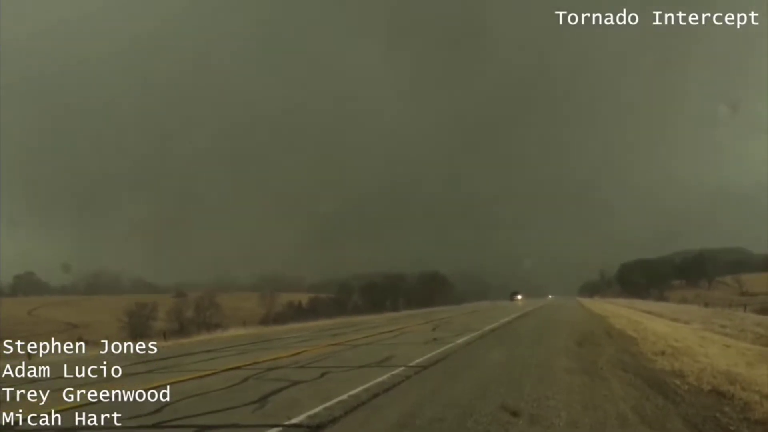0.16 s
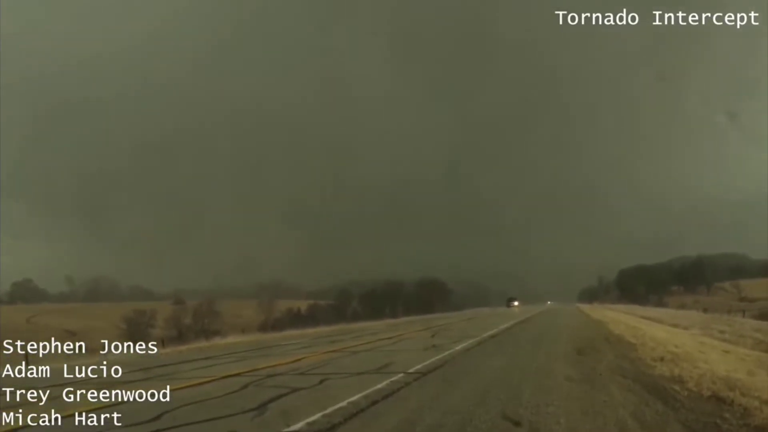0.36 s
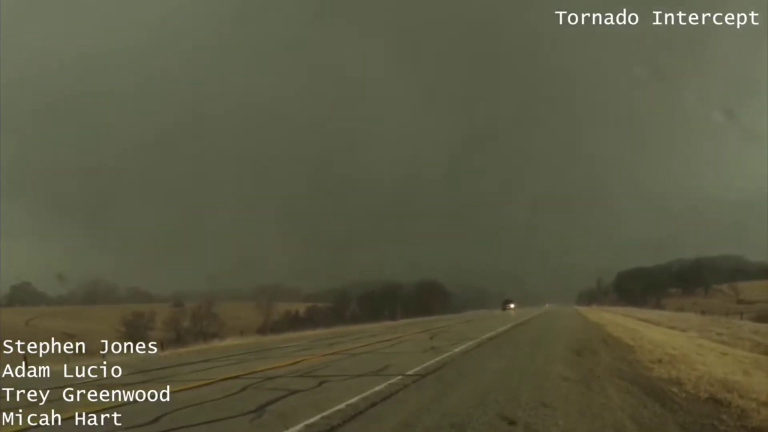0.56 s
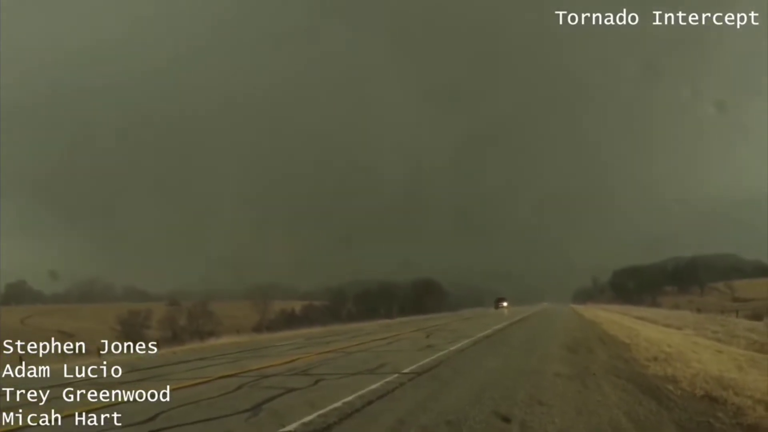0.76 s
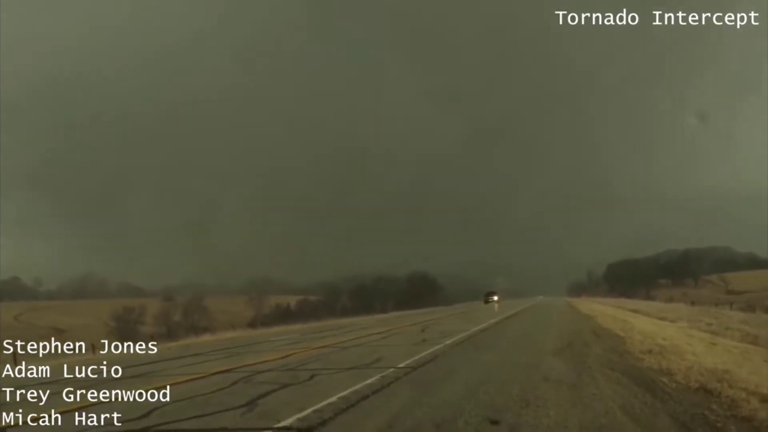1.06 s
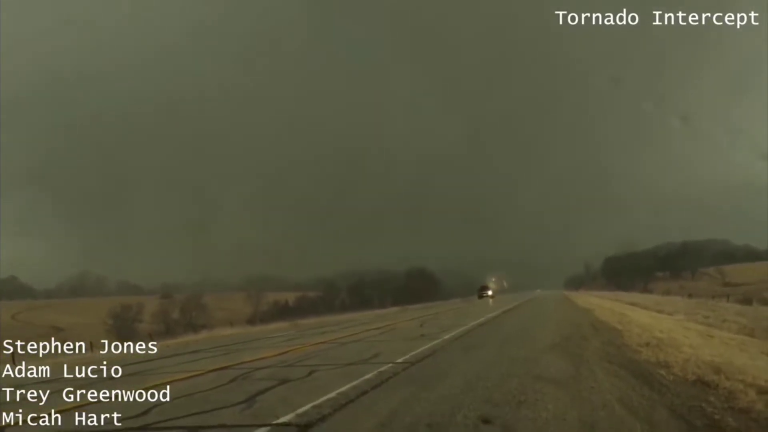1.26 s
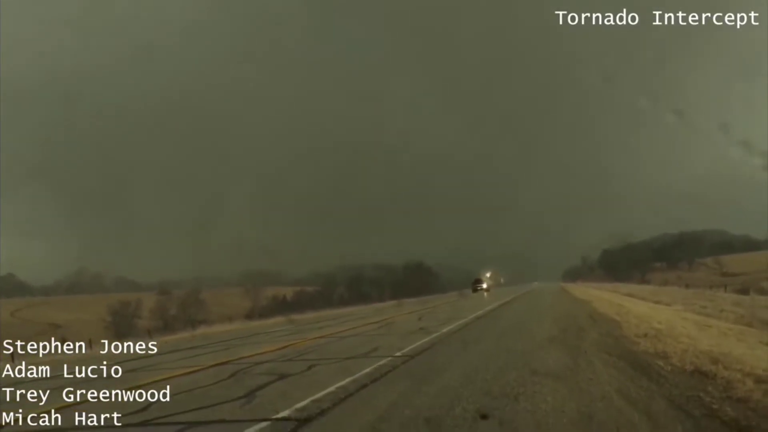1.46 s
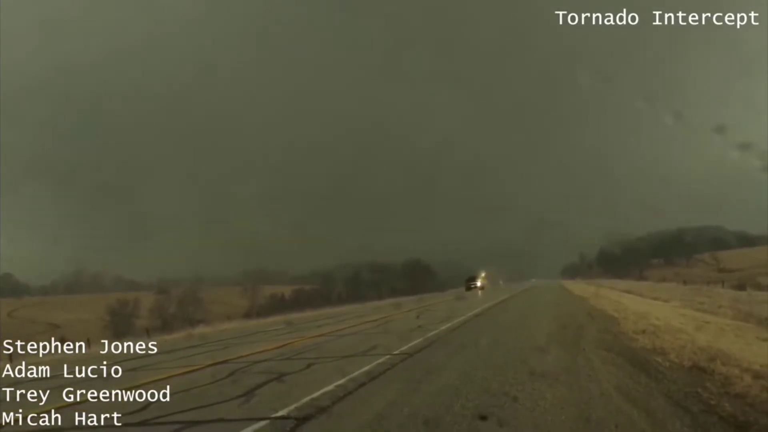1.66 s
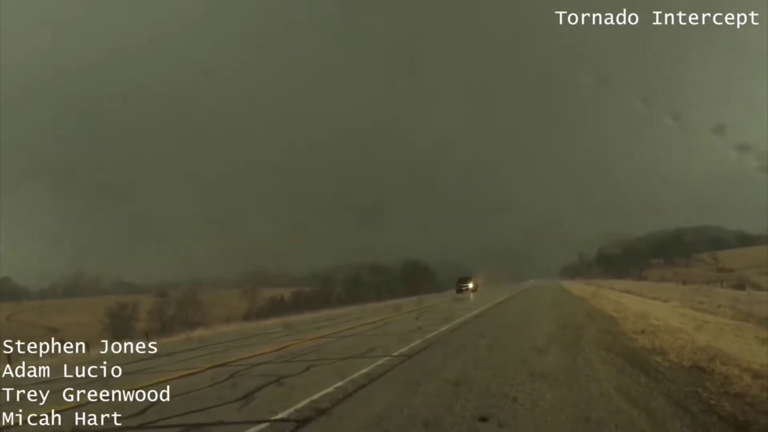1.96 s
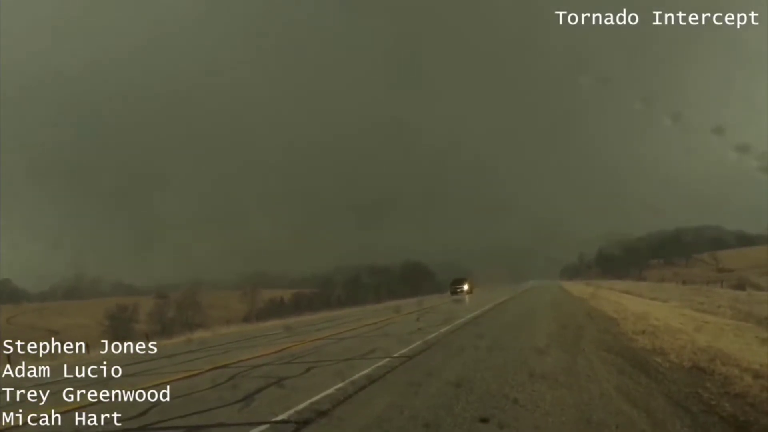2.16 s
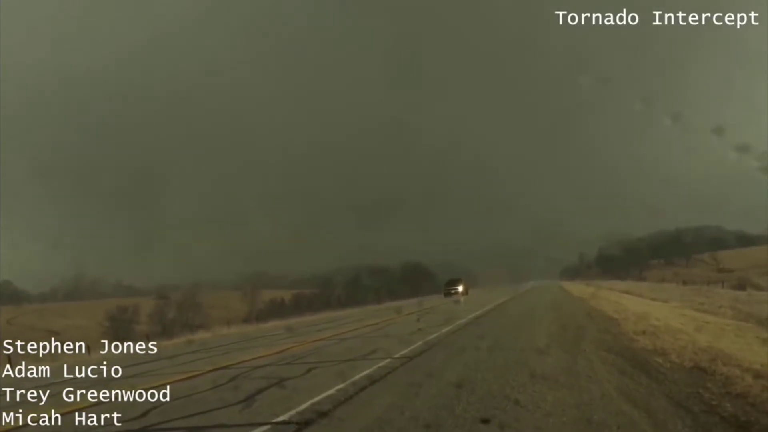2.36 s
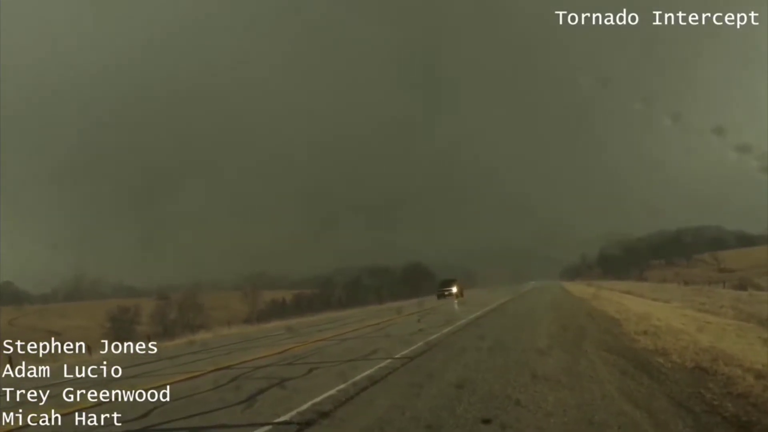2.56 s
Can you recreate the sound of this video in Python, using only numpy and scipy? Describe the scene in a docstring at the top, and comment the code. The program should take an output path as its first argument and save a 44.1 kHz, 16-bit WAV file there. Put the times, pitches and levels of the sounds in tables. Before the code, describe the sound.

Heavy rain on a vehicle's windshield and roof, heard close inside a dry, padded cabin. Light patter opens with a tick and low knock near 0.2 s. At 0.3 s a sheet of water slaps the body and rain surges, fat drops splatting rapidly with short metallic pings until 1.45 s. A stronger, hissing surge peaks around 1.7 s, easing after 2 s and fading by 2.7 s over very faint low hum.

```python
"""Heavy rain on the windshield and roof of a vehicle, heard from inside: 2.7 s.
Light at first, with a sharp tick and a low knock; at 0.3 s a sheet of water slaps the body and the rain surges.
Fat drops (droplet bursts ringing panels) splatter over dense random patter and drumming, with short metallic pings.
A second, stronger surge peaks near 1.7 s, with more spray hiss (tiny filtered drops); then the patter fades.
A wavering sine and low noise hum faintly throughout; a limiter holds the peaks."""
import sys
import numpy as np
from scipy import signal
from scipy.fft import rfft, irfft
from scipy.io import wavfile
from scipy.ndimage import uniform_filter1d, minimum_filter1d

SR = 44100
rng = np.random.default_rng(int(sys.argv[2]) if len(sys.argv) > 2 else 0)


def store_pcm(level_fs):
    """Save levels as 16-bit WAV."""
    pcm = np.round(np.clip(level_fs, -1, 1) * 32767).astype(np.int16)
    wavfile.write(sys.argv[1], SR, np.atleast_2d(pcm).T)


N = 119070

# fat drops on the windshield, levels before trim: (time [s], length [s], glass level [dB], body thud level [dB])
SPLATS = [(0.178, 0.007, -12.5, -20.0), (0.231, 0.003, -15.5, -29.0), (0.387, 0.005, -12.0, -20.0),
          (0.419, 0.014, -11.0, -29.0), (0.468, 0.002, -10.0, -21.0), (0.513, 0.015, -13.0, -24.0),
          (0.557, 0.009, -11.0, -26.0), (0.684, 0.012, -13.0, -25.0), (0.717, 0.008, -13.0, -23.0),
          (0.779, 0.009, -10.0, -23.0), (0.822, 0.006, -15.0, -27.0), (0.903, 0.006, -14.0, -27.0),
          (0.926, 0.004, -12.0, -23.0), (0.971, 0.004, -16, -27), (0.984, 0.006, -11.0, -25.0),
          (1.01, 0.009, -12, -25), (1.023, 0.003, -10.0, -25.0), (1.085, 0.02, -15, -28),
          (1.109, 0.013, -13.0, -26.0), (1.139, 0.005, -14.0, -26.0), (1.179, 0.005, -12.0, -32.0),
          (1.224, 0.009, -13.0, -24.0), (1.274, 0.014, -14.0, -27.0), (1.302, 0.002, -7.5, -23.0),
          (1.411, 0.004, -14.0, -27.0), (1.419, 0.003, -9.0, -20.0), (1.439, 0.012, -15.0, -25.0),
          (1.762, 0.004, -11.0, -23.0), (2.007, 0.007, -14.0, -29.0), (2.157, 0.004, -14.0, -27.0),
          (2.189, 0.014, -15.0, -29.0), (2.212, 0.003, -14.0, -18.0), (2.258, 0.008, -13.0, -28.0),
          (2.36, 0.003, -14.0, -33.0), (2.431, 0.003, -12.0, -25.0), (2.575, 0.004, -17.0, -28.0),
          (2.643, 0.004, -21.0, -24.0)]
# low knocks of single heavy drops on a body panel: (time [s], level [dB])
KNOCKS = [(.182, -17), (.629, -25), (.722, -17.5), (1.913, -19)]
# small sharp ticks: (time [s], level [dB])
TICKS = [(.181, -19.5), (0.345, -18), (1.523, -25), (1.803, -21), (2.078, -22.5), (2.26, -26)]
# strength of the rain: (time [s], glass patter level [dB], roof drumming level [dB])
RAIN = [(0, -32, -25.5), (.12, -28, -24), (.28, -27.5, -22.5), (.33, -18, -24.5), (.53, -14.5, -20.5),
        (.66, -14.5, -26.5), (.76, -24, -24.5), (.92, -16.5, -24.5), (1.04, -24, -25), (1.12, -19.5, -25.5),
        (1.5, -19.5, -26), (1.6, -14.5, -21), (1.68, -11, -21), (1.92, -14.5, -23), (2.02, -20, -25),
        (2.4, -20, -25), (2.62, -31.5, -27.5)]
# brief dips of the patter: time [s]
DIP_TIMES_S = [.281, 0.802, 0.965, 1.0, 1.045, 1.056, 1.158, 1.197, 1.784, 2.234, 2.311]
# sheet of water on the body: (time [s], level [dB])
SHEET = [(.296, -26), (.305, -13.5), (.34, -14.5), (.366, -17.5), (.378, -32)]
# fine spray: (time [s], level [dB])
SPRAY = [(0, -42), (.28, -39.5), (.34, -29.5), (.42, -45), (1.3, -45), (1.55, -38.5), (1.82, -34.5),
         (2.0, -42.5), (2.7, -47)]
# cabin hum tone: (time [s], level [dB])
HUM = [(0, -59.5), (.3, -55.5), (.55, -73.5), (1.25, -56.5), (1.9, -58), (2.7, -65)]
# ring of the windshield: (frequency [Hz], relative density [dB per Hz])
GLASS_COLOUR = [(200, -55), (600, -23.5), (1200, -14), (2000, -17.5), (3200, -11), (3520, 2), (3730, 1),
                (3970, -9), (4200, -5), (5300, -3.5), (6200, -8), (6900, -21.5), (7800, -39.5),
                (9800, -30.5), (11500, -41.5), (15000, -50)]
# ring of the roof and body: (frequency [Hz], relative density [dB per Hz])
ROOF_COLOUR = [(215, -45), (310, -29), (500, -16), (700, -17), (900, -5.5), (1200, 3), (1720, 2),
               (2050, -1.5), (2900, -3), (3300, -1.5), (3630, -1), (4050, -22), (5200, -9), (6400, -12.5),
               (8000, -47), (15000, -47)]
# ring of a body panel under heavy water: (frequency [Hz], relative density [dB per Hz])
PANEL_COLOUR = [(200, -42.5), (650, -19.5), (900, -1.5), (1170, 0.5), (1850, 0), (2100, -7.5), (4500, -25),
                (9000, -32)]
# fizz of spray and ticks: (frequency [Hz], relative density [dB per Hz])
FIZZ_COLOUR = [(3000, -86), (6500, -9), (8000, -17.5), (9150, 1), (10200, 0), (11000, -12.5), (11700, -11),
               (12900, 3.5), (13800, -7), (15000, -23)]
# low cabin noise: (frequency [Hz], relative density [dB per Hz])
RUMBLE_COLOUR = [(50, 4), (130, 1.5), (210, -11), (2000, -67)]

SPLAT_TRIM_DB, THUD_TRIM_DB = 0.7, 0.5
THUD_TILT_DB_PER_OCT = -2.5  # a fat drop rings the body lower than a small one
SPLAT_SKIRT = .15  # gain of the stray droplets around a splat
SPATTER_PER_S = 7000  # droplets within one splat
KNOCK_S, TICK_S = .008, 0.001
PATTER_PER_S, PATTER_SPREAD_DB, PATTER_SCATTER_S = 1300, 4, 0.00071
DRUM_PER_S, DRUM_SPREAD_DB, DRUM_SCATTER_S = 1400, 2, 0.00091
SHEET_PER_S, SHEET_SPREAD_DB = 3100, 2.5
SHEET_GLASS_DB = -3  # part of the sheet that hits the windshield
SPRAY_PER_S, SPRAY_SPREAD_DB, SPRAY_SCATTER_S, SPRAY_WIDTH = 2600, 2.5, 0.00024, 0.027
SIZE_CAP_SPREADS = 3.85  # largest drop
CROWDING = .7  # harder rain brings more drops: rate goes as strength to this power
SPOT_DB, SPOT_HZ = 1.5, 671  # depth and frequency grid of ring differences between spots
DIP_DB, DIP_SIGMA_S = -5.5, 0.0048
PING_HZ, PING_T60_S, PING_PER_S, PING_DB = 3686, 0.013, 220, -9
PING_DETUNE = .03  # fraction of the pitch
HUM_HZ, HUM_WAVER, WAVER_PER_S = 92.4, 0.38, 7.97
RUMBLE_DB = -63.5
CABIN_DB, CABIN_T60_S = -14.5, 0.055
CEILING, LIMIT_S = .92, .001
EDGE_HZ = 15000


def amp(db):
    """Decibels to gain."""
    return 10 ** (np.asarray(db) / 20)


def unit(x):
    """Scales to rms 1."""
    return x / np.sqrt(np.mean(x ** 2) + 1e-20)


def level(table, column=1):
    """Level curve of a table column as a gain per sample."""
    rows = np.array(table)
    return amp(np.interp(np.arange(N) / SR, rows[:, 0], rows[:, column]))


def add(mix, time_s, sound):
    """Mixes a sound in at a time."""
    part = mix[max(round(time_s * SR), 0):][:len(sound)]
    part += sound[:len(part)]


def ring(colour, uneven_db=0, size=2048):
    """Minimum-phase response of a panel; the struck spot shifts its spectrum at random."""
    hz = np.fft.rfftfreq(size, 1 / SR)
    table_hz, table_db = np.transpose(colour)
    spot = np.interp(hz / SPOT_HZ, np.arange(size), rng.standard_normal(size))
    gain_db = np.interp(np.log(hz + 1), np.log(table_hz), table_db) + uneven_db * spot
    cepstrum = irfft(np.log(amp(gain_db)))
    # folding the cepstrum makes the response causal
    cepstrum[1:size // 2] *= 2
    cepstrum[size // 2 + 1:] = 0
    return irfft(np.exp(rfft(cepstrum)))


def burst(colour, time_s, length_s, db, size=4096):
    """One fat drop: a short spatter with stray droplets around it rings a panel; returns start and sound."""
    length_s = max(length_s, 1 / 1000)
    offset = (np.arange(size) - size / 2) / SR / (length_s / 2)
    envelope = np.exp(-offset ** 4 / 2) + SPLAT_SKIRT * np.exp(-abs(offset) / 2)
    droplets = rng.standard_normal(size) * (rng.random(size) < SPATTER_PER_S / SR)
    sound = signal.fftconvolve(droplets * envelope, ring(colour, SPOT_DB))
    start_s = time_s + length_s / 2 - size / 2 / SR
    return start_s, amp(db) * np.sqrt(length_s * SR) * sound / np.linalg.norm(sound)


def fat_drops():
    """Splats ring the glass and thud the body; single bursts give low panel knocks and sharp ticks."""
    out = np.zeros(N)
    thud_colour = [(hz, db + THUD_TILT_DB_PER_OCT * np.log2(hz)) for hz, db in ROOF_COLOUR]
    for time_s, length_s, glass_db, thud_db in SPLATS:
        add(out, *burst(GLASS_COLOUR, time_s, length_s, glass_db + SPLAT_TRIM_DB))
        add(out, *burst(thud_colour, time_s, length_s, thud_db + THUD_TRIM_DB))
    for time_s, db in KNOCKS:
        add(out, *burst(PANEL_COLOUR, time_s, KNOCK_S, db))
    for time_s, db in TICKS:
        add(out, *burst(FIZZ_COLOUR, time_s, TICK_S, db))
    return out


def shower(colour, per_s, spread_db, scatter_s, strength=1, count=60, size=600):
    """Random drops of random size on many spots of a panel; each is a noise scatter that swells and fades."""
    crowd = (strength / np.mean(strength)) ** CROWDING
    sizes = amp(spread_db * np.minimum(rng.exponential(1, N), SIZE_CAP_SPREADS))
    sizes = sizes * (rng.random(N) < crowd * per_s / SR)
    sizes = sizes / np.sqrt(crowd)  # offsets the power of the extra drops
    spots, out = rng.integers(0, count, N), np.zeros(N)
    age = np.arange(size) / SR / scatter_s
    for k in range(count):
        scatter = rng.standard_normal(size) * age ** 2 * np.exp(-age)
        drop = unit(signal.fftconvolve(scatter, ring(colour, SPOT_DB)))[:2 * size]
        for at in np.flatnonzero(sizes * (spots == k)):
            add(out, at / SR, sizes[at] * drop)
    return strength * unit(out)


def dips():
    """Patter gain: Gaussian dips in dB where the level drops briefly."""
    t = np.arange(N) / SR
    return amp(DIP_DB * sum(np.exp(-((t - s) / DIP_SIGMA_S) ** 2 / 2) for s in DIP_TIMES_S))


def sheet_gain():
    """Gain of the sheet of water, zero outside its table."""
    t = np.arange(N) / SR
    return level(SHEET) * (t > SHEET[0][0]) * (t < SHEET[-1][0])


def glass_patter():
    """Small drops, plus part of the sheet, ring the windshield."""
    strength = np.hypot(level(RAIN, 1), amp(SHEET_GLASS_DB) * sheet_gain())
    return shower(GLASS_COLOUR, PATTER_PER_S, PATTER_SPREAD_DB, PATTER_SCATTER_S, strength)


def roof_drumming():
    """Small drops ring the roof, duller than the glass."""
    return shower(ROOF_COLOUR, DRUM_PER_S, DRUM_SPREAD_DB, DRUM_SCATTER_S, level(RAIN, 2))


def sheet_slap():
    """A sheet of water rings a body panel as a short, very dense shower."""
    return sheet_gain() * shower(PANEL_COLOUR, SHEET_PER_S, SHEET_SPREAD_DB, DRUM_SCATTER_S)


def patter():
    """Glass, roof and sheet; the dips act at half depth in dB on the roof, not on the sheet's panel."""
    dip = dips()
    return dip * glass_patter() + np.sqrt(dip) * roof_drumming() + sheet_slap()


def pings(size=1500):
    """Drops excite one decaying mode, detuned per drop and coloured by the glass ring."""
    t, out = np.arange(size) / SR, np.zeros(N)
    decay = np.exp(-np.log(1000) * t / PING_T60_S)
    for at in np.flatnonzero(rng.random(N) < PING_PER_S / SR):
        hz = PING_HZ * (1 + PING_DETUNE * rng.uniform(-1.17, 1))
        add(out, at / SR, rng.rayleigh() * np.sin(2 * np.pi * hz * t) * decay)
    strength = np.sqrt(level(RAIN, 1) * level(RAIN, 2))
    return amp(PING_DB) * strength * unit(signal.oaconvolve(out, ring(GLASS_COLOUR))[:N])


def spray():
    """Fine droplets fizz, slightly wide in stereo."""
    mid = shower(FIZZ_COLOUR, SPRAY_PER_S, SPRAY_SPREAD_DB, SPRAY_SCATTER_S)
    side = shower(FIZZ_COLOUR, SPRAY_PER_S, SPRAY_SPREAD_DB, SPRAY_SCATTER_S)
    return level(SPRAY) * (mid + SPRAY_WIDTH * np.array([side, -side]))


def hum():
    """A faint low sine of randomly wavering level over filtered-noise rumble."""
    t = np.arange(N) / SR
    waver = 1 + HUM_WAVER * np.interp(t * WAVER_PER_S, np.arange(N), rng.standard_normal(N))
    tone = np.sqrt(2) * waver * np.sin(2 * np.pi * HUM_HZ * t)
    rumble = unit(signal.oaconvolve(rng.standard_normal(N), ring(RUMBLE_COLOUR, size=8192))[:N])
    return level(HUM) * tone + amp(RUMBLE_DB) * rumble


def cabin(x, size=6000):
    """Short, dense reflections of the padded cabin: a decaying noise tail after 2 ms."""
    t = np.arange(size) / SR
    tail = rng.standard_normal(size) * np.exp(-np.log(1000) * t / CABIN_T60_S) * (t > .002)
    return x + amp(CABIN_DB) * signal.oaconvolve(x, tail / np.linalg.norm(tail))[:N]


def scene():
    """Rain with cabin reflections, then dry hum and spray; nearly mono."""
    return cabin(patter() + pings() + fat_drops()) + hum() + spray()


def record(dry):
    """A fast limiter, its gain shared by both channels, then a low-pass."""
    span = max(int(LIMIT_S * SR), 2)
    gain = np.minimum(1, CEILING / (abs(dry).max(0) + 1e-9))
    held = dry * uniform_filter1d(minimum_filter1d(gain, span), span)
    low_pass = signal.firwin(301, EDGE_HZ, window=("kaiser", 9), fs=SR)
    return signal.oaconvolve(held, low_pass[None], "same")


dry = scene()
out = record(dry)
store_pcm(out)
```